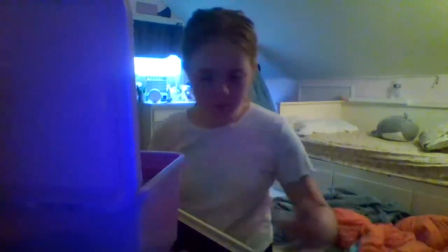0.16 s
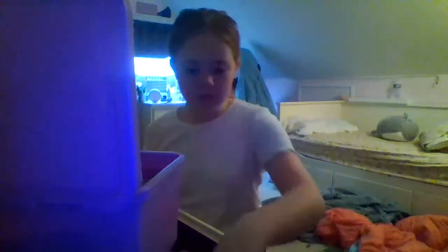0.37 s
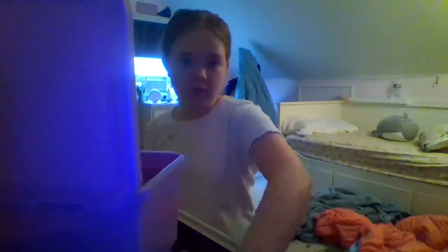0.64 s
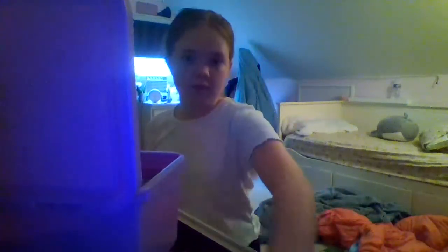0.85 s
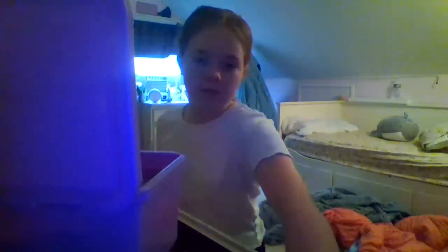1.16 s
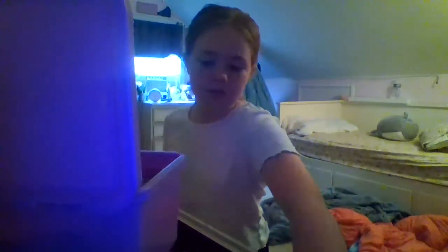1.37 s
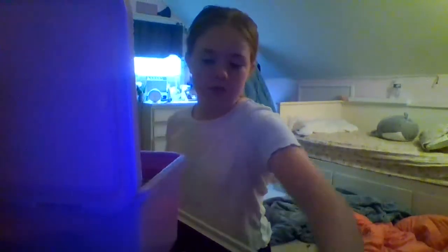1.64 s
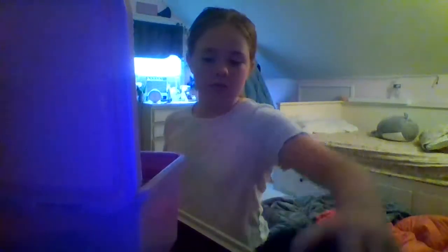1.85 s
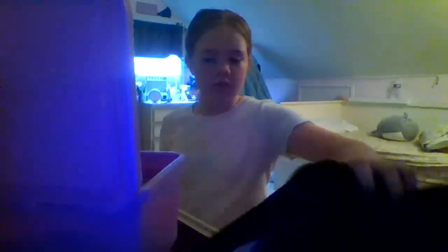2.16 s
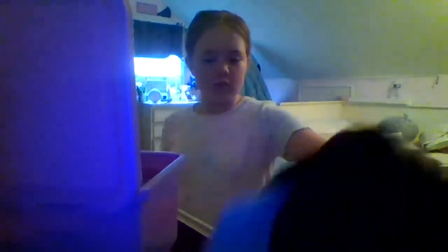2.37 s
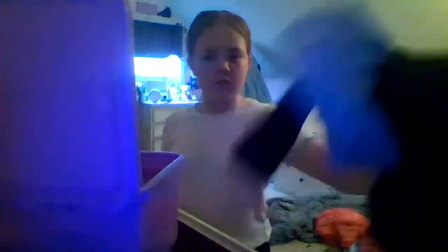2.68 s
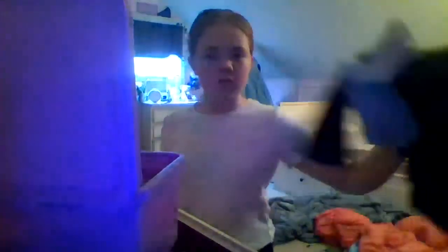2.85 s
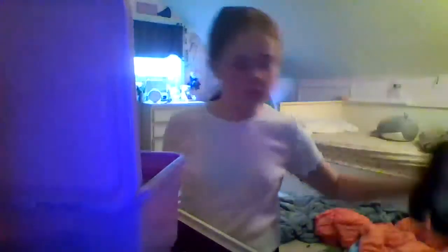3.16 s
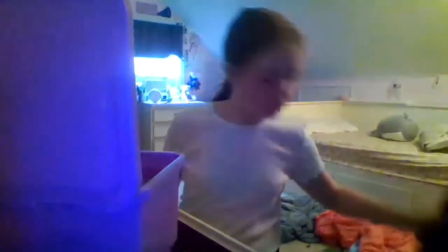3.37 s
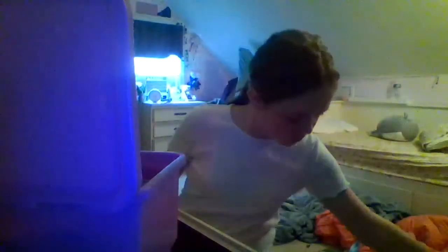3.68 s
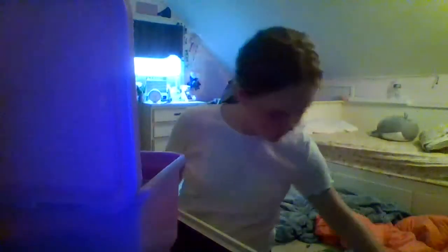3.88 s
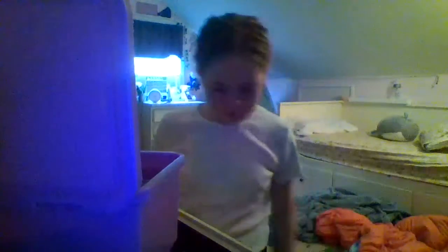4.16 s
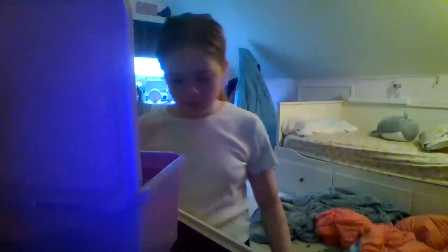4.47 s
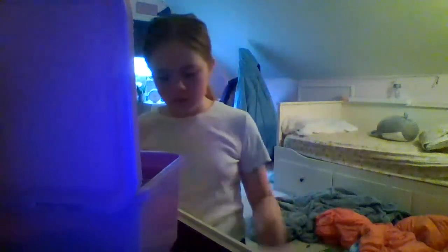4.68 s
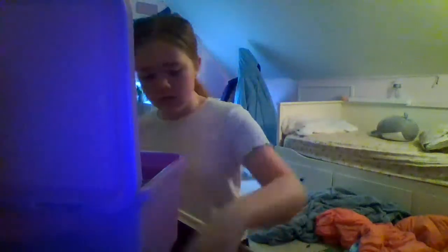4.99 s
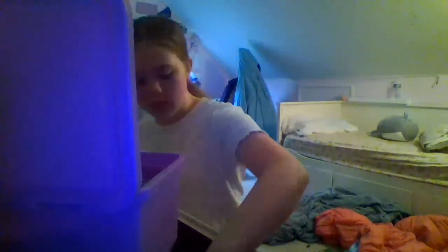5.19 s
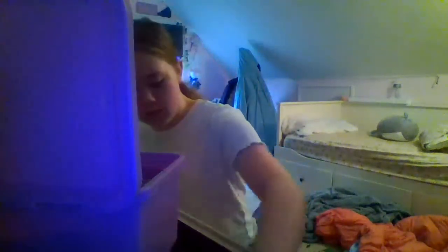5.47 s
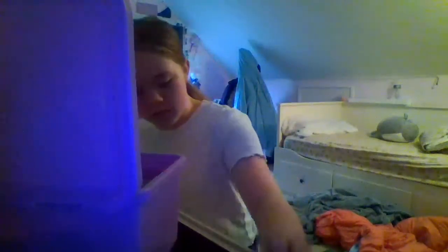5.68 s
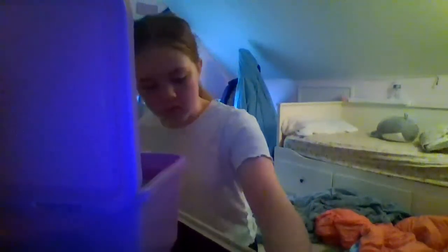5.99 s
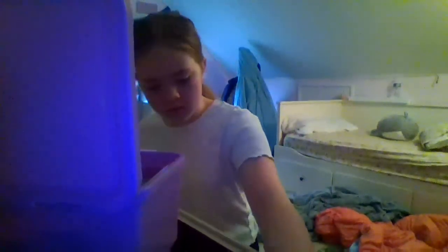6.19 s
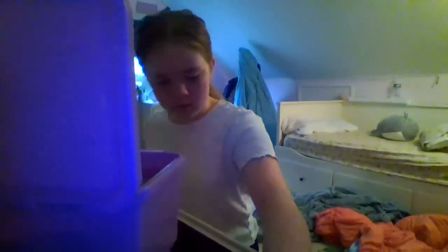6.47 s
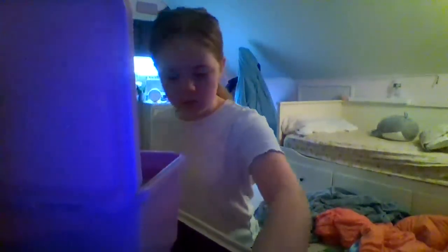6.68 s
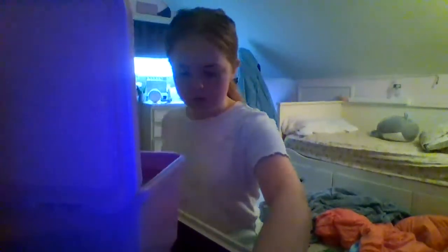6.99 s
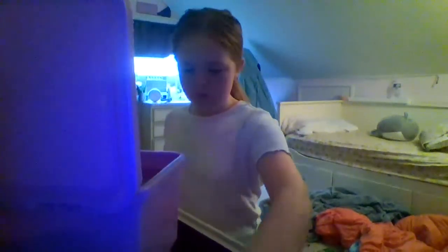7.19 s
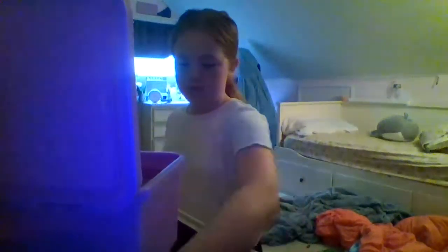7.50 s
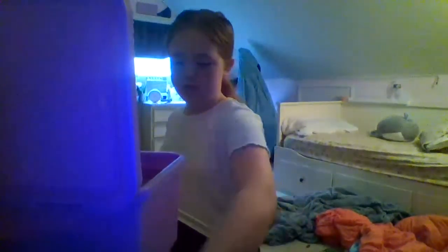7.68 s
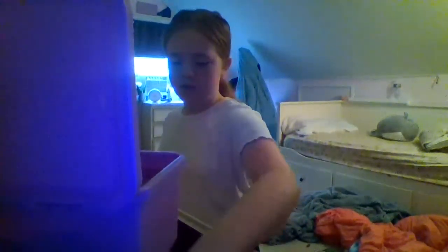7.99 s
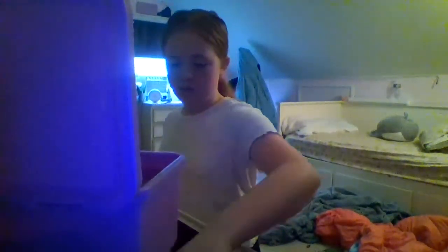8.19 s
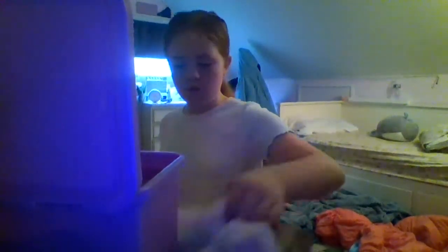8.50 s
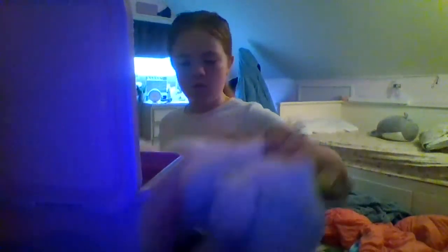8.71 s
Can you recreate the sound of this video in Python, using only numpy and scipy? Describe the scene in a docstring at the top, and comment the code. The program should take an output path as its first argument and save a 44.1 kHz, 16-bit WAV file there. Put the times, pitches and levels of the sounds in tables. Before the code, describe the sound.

In a small, furnished bedroom, hands rummage in a wooden drawer very close to a stereo microphone, over faint low hum, a thin whine and hiss. Soft rustling and a light touch come first; at 0.75 s a scrape swells into a rapid clatter of hollow knocks and clacks from 1.0 to 1.6 s, with low drawer bumps. From 2.0 to 2.5 s, lighter, brighter ticks mix with cloth swishes. It grows quiet, with faint touches around 3.1 and 3.9 s. At 5.2 s there is a woody bump, then a sharp, loud clack at 5.7 s. Faint rustles follow, a firm knock at 7.05 s, soft brushing and a dull bump at 7.7 s. Scraping builds from 8.0 s with a knock at 8.1 s, and heavy, slightly distorted thumps at 8.55 and 8.65 s leave a faint metallic ping fading away.

```python
"""Rummaging in a wooden drawer

Hands rummage through a drawer in a small bedroom, right beside a pair of tiny microphones.
Cloth swishes and things scrape over the wood: shaped noise that swells with each stroke of the hand.
Knocks are short chatters of noise through resonances; the drawer's bumps and a metal ping are dying sines.
A faint mains hum and hiss lie below; the microphones ring near 10 kHz and the loudest peaks clip."""
import sys
import numpy as np
from scipy import signal
from scipy.fft import rfft, irfft, next_fast_len
from scipy.io import wavfile

SR = 44100
rng = np.random.default_rng(int(sys.argv[2]) if len(sys.argv) > 2 else 0)


def unload_wav(signal):
    """Save mono or channel-first audio to the path in sys.argv[1] as 16-bit WAV at rate SR, clipped to [-1, 1]."""
    wavfile.write(
        sys.argv[1],
        SR,
        np.round(np.clip(np.atleast_2d(signal).T, -1, 1) * 32767).astype(np.int16),
    )


N = 390284
TIME = np.arange(N) / SR

# things knocking in the drawer; square hits rise fast, glancing ones slowly (levels before trims):
# [t/s, body level/dB, edge tick level/dB, pitch of the thing f/Hz, rise/s, settling t60/s]
KNOCKS = [(0.523, -42, -65, 377, 0.0023, 0.054), (0.98, -8.5, -38, 1700, 0.0013, 0.032),
          (1.001, -6.5, -9, 450, .0006, .11), (1.027, -8.5, -12.5, 1490, .0024, 0.051),
          (1.058, -3, -24, 1500, 0.0011, 0.074), (1.08, -6, -28, 790, 0.0012, .11),
          (1.097, -13.5, -38, 535, 0.0011, 0.071), (1.117, -13, -24, 1570, .0024, 0.076),
          (1.126, -7.5, -16, 1090, 0.00086, 0.068), (1.155, -13, -47, 1500, .002, 0.032),
          (1.241, -8.5, -28.5, 518, 0.003, .027), (1.273, -14, -27, 554, .003, 0.048),
          (1.341, -14.5, -31, 503, 0.00076, 0.045), (1.464, -18, -17, 380, 0.0033, 0.017),
          (1.561, -7.5, -11, 594, .0015, 0.042), (2.002, -27.5, -33, 6960, 0.00078, 0.25),
          (2.045, -10, -18.5, 4440, 0.0091, 0.093), (2.105, -24, -29, 1620, .0013, 0.041),
          (2.121, -15.5, -48, 2600, 0.00084, 0.06), (2.148, -27, -17, 6800, .0013, 0.043),
          (2.164, -23.5, -27.5, 627, .002, 0.12), (2.224, -20, -39, 3060, 0.0015, .087),
          (2.252, -22, -29.5, 1010, 0.00085, 0.095), (2.311, -13, -13, 1630, 0.00067, 0.083),
          (2.345, -19.5, -23.5, 7000, 0.00055, 0.11), (2.427, -22.5, -19.5, 6050, .0007, 0.047),
          (2.471, -25, -31, 7140, .001, 0.16), (3.028, -41.5, -51, 364, 0.0042, 0.21),
          (3.116, -32.5, -30.5, 4630, 0.0015, .1), (3.263, -44, -67, 700, .002, 0.047),
          (3.877, -31, -48.5, 666, 0.0018, 0.13), (3.96, -34.5, -53, 428, 0.0079, .1),
          (5.173, -19.5, -57, 620, .0007, 0.12), (5.235, -10.5, -13, 596, 0.0049, 0.07),
          (5.284, -25, -64, 1660, 0.00092, 0.24), (5.597, -33, -36.5, 5000, 0.0018, 0.28),
          (5.67, 2.5, -15.5, 2790, 0.0045, 0.049), (5.743, -12, -18, 3350, .0014, 0.035),
          (5.779, -27, -26.5, 4700, .001, 0.063), (6.301, -66, -42.5, 9000, .0004, 0.017),
          (6.35, -43, -70, 600, 0.0021, 0.069), (6.888, -33.5, -27, 5170, 0.0098, 0.056),
          (7.055, -3.5, -22, 1670, 0.0028, 0.05), (7.126, -43, -35, 3600, .001, 0.017),
          (7.71, -26, -40, 404, 0.0029, 0.18), (7.776, -35, -38.5, 420, 0.0022, .047),
          (8.012, -11.5, -42, 670, 0.0016, 0.059), (8.118, -4.5, -12.5, 504, 0.00028, 0.099),
          (8.53, -28, -21, 417, .0007, 0.28), (8.543, -13.5, -14, 1980, 0.00043, 0.073),
          (8.56, -1, -14.5, 644, 0.0015, 0.14), (8.651, -1, -20.5, 615, 0.0018, 0.12)]
# stereo width of tail and hiss: [f/Hz, gain/dB]
STEREO_WIDTH = [(100, -64), (2400, -33), (5000, -7.5), (15000, -18)]


def from_db(db):
    """Decibels to gain."""
    return 10 ** (np.asarray(db) / 20)


def rms_one(x):
    """Scale to rms 1."""
    return x / np.sqrt(np.mean(x ** 2) + 1e-20)


def at_hz(points, hz):
    """Read a table on a log-frequency axis."""
    known_hz, values = np.transpose(points)
    return np.interp(np.log(np.maximum(hz, 1)), np.log(known_hz), values)


def colour(x, spectrum):
    """Filter a steady signal by a table of gains over frequency."""
    size = next_fast_len(len(x))
    hz = np.arange(size // 2 + 1) * SR / size
    gain = from_db(at_hz(spectrum, hz))
    return irfft(rfft(x, size) * gain, size)[:len(x)]


def band(x, low_hz, high_hz):
    """Band-pass that roughly keeps the rms of a white input."""
    sos = signal.butter(2, [low_hz, high_hz], "band", fs=SR, output="sos")
    return signal.sosfilt(sos, x + 1e-18) * np.sqrt(SR / 2 / (high_hz - low_hz))


def resonate(x, hz, width_hz, boost_db):
    """Boost or dip one resonance: a two-pole peak is mixed with the sound itself."""
    radius = np.exp(-np.pi * width_hz / SR)
    zeros = np.array([1, 0, -1]) * (1 - radius ** 2) / 2
    poles = [1, -2 * radius * np.cos(2 * np.pi * hz / SR), radius ** 2]
    peak = signal.lfilter(zeros, poles, x + 1e-18)
    return x + (from_db(boost_db) - 1) * peak


def drift(rate):
    """Smooth random wander, about `rate` new values a second; rms 1."""
    steps = rng.standard_normal(N // 10)
    return rms_one(np.interp(TIME * rate, np.arange(len(steps)), steps))


def grains(size, spread_db):
    """Dense tiny contacts of very unequal strength; rms 1."""
    strength_db = spread_db * np.clip(rng.standard_normal(size), -2, 2)
    return rms_one(rng.standard_normal(size) * from_db(strength_db))


def add(track, s, sound):
    """Lay a sound into a track at a time in seconds."""
    at = int(np.clip(round(s * SR), 0, N - 1))
    track[at:at + len(sound)] += sound[:N - at]


def background(own_db=3.5, air_db=-35.0):
    """Low room noise and hiss, partly opposite in the two channels, over steady hum and a thin whine."""
    # mains hum and electronic whine: [f/Hz, rms level/dB before the microphones]
    hum_tones = [(120, -46.5), (240.5, -44.5), (7499, -65.5)]
    # spectrum of room noise and hiss: [f/Hz, relative level/dB]
    air_spectrum = [(20, 1), (35, 1.5), (70, -9.5), (180, -14), (300, -24), (500, -30), (1000, -36.5),
                    (3000, -39.5), (9000, -44.5), (16000, -40)]
    hum = 0
    for hz, db in hum_tones:
        hum = hum + from_db(db) * np.sqrt(2) * np.sin(2 * np.pi * (hz * TIME + rng.random()))
    white_pair = rng.standard_normal((2, N))
    shared, own = [from_db(air_db) * rms_one(colour(white, air_spectrum)) for white in white_pair]
    side = from_db(own_db) * colour(own, STEREO_WIDTH)
    return hum + shared + side * np.array([[1], [-1]])


def stroke(t, length, attack_share=0.29, release_t60_s=0.25):
    """A hand stroke swells over a share of its length, holds, and dies away when the hand stops."""
    swell = np.sin(np.pi / 2 * np.minimum(t / (attack_share * length), 1)) ** 2
    return swell * from_db(-60 * np.maximum(t - length, 0) / release_t60_s)


def catches(per_s=130, ring_cycles=17, low_hz=430, high_hz=1900):
    """Edges catch and let go at random, each time ringing briefly at some pitch; rms 1."""
    out, t = np.zeros(N), TIME[:SR // 16]
    chance, strength, pitch = rng.random(N), rng.standard_normal(N), rng.random(N)
    for at in np.flatnonzero(chance < per_s / SR):
        hz = low_hz * (high_hz / low_hz) ** pitch[at]
        decay = from_db(-60 * t * hz / ring_cycles)  # 60 dB down after ring_cycles periods
        add(out, at / SR, strength[at] * np.sin(2 * np.pi * hz * t) * decay)
    return rms_one(out)


def rubbing(scrape_trim_db=-5.5, catch_trim_db=-10.5, swish_trim_db=-1.5, slip_db=2.5, fold_db=1.73,
            dragged_db=6, dragged_width_hz=520, uneven_db=1.6, idle_db=-62,
            rumble_db=-20, rumble_follows=0.37):
    """Things stick and slip over the wood, cloth fibres brush past each other, shifting weight rumbles."""
    # strokes of the hand (levels before trims):
    # [t/s, length/s, scrape level/dB, swish level/dB, pitch of the dragged thing f/Hz]
    strokes = [(0, 0.0071, -31.5, -45, 450), (0.429, 0.35, -46.5, -43, 700),
               (0.745, 0.38, -20, -24.5, 1190), (1.255, 0.096, -26.5, -34, 1200),
               (1.544, 0.12, -30, -39, 1380), (1.676, 0.38, -37.5, -36, 690), (2.021, 0.48, -39, -36, 1410),
               (2.482, .04, -36, -38.5, 1800), (2.532, 0.15, -51, -43.5, 1200),
               (3.028, 0.061, -51, -43.5, 1300), (3.14, .17, -56, -54, 1300),
               (3.601, 0.18, -52.5, -48.5, 1100), (3.844, 0.13, -35.5, -47, 650),
               (4.205, 0.16, -67, -51, 700), (5.164, 0.043, -25, -34, 550), (5.214, 0.033, -27.5, -25, 620),
               (5.301, 0.11, -45.5, -39, 1600), (5.579, 0.14, -33, -38.5, 600),
               (5.736, 0.061, -30, -32.5, 600), (5.832, 0.1, -44, -47, 700), (6.011, .1, -50, -48.5, 597),
               (6.152, .25, -52, -61.5, 600), (6.928, 0.12, -61, -42.5, 1400), (7.17, 0.53, -50, -46, 1210),
               (7.82, 0.047, -50, -43, 600), (7.983, 0.58, -24, -33, 600), (8.269, 0.12, -18, -32, 590),
               (8.51, 0.12, -19, -29.5, 500)]
    # spectra of scraped wood, brushed cloth and the rumbling drawer: [f/Hz, relative level/dB]
    scrape_spectrum = [(120, -20), (300, -2), (550, 0.5), (1000, -9.5), (1600, -9.5), (2500, -14),
                       (5000, -23.5), (16000, -63)]
    swish_spectrum = [(500, -12), (1500, -2.5), (3000, 1.5), (6000, 2.5), (9000, 3.5), (12000, -0.5),
                      (16000, -3.5)]
    rumble_spectrum = [(25, -32), (50, -2), (110, 1.5), (170, -8), (260, -12), (500, -59)]

    slips, t = drift(140), TIME[:3 * SR // 2]
    grit = rms_one(colour(grains(N, spread_db=7.5), scrape_spectrum))
    edges = from_db(scrape_trim_db + slip_db * slips) * grit + from_db(catch_trim_db) * catches()
    edges = edges * from_db(uneven_db * drift(30))  # the hand presses unevenly

    scrape = np.zeros(N)
    wood_power, cloth_power = np.full((2, N), from_db(idle_db) ** 2)  # a faint stir between strokes
    for start, length, scrape_db, swish_db, hz in strokes:
        effort = stroke(t, length)
        at = rng.integers(N - len(t))  # each stroke takes a random stretch of the scraping
        dragged = rms_one(resonate(edges[at:at + len(t)], hz, dragged_width_hz, dragged_db))
        add(scrape, start, from_db(scrape_db) * effort * np.std(edges) * dragged)
        add(wood_power, start, (from_db(scrape_db) * effort) ** 2)
        add(cloth_power, start, (from_db(swish_db) * effort) ** 2)

    fibres = rms_one(colour(grains(N, spread_db=5.5), swish_spectrum))
    swish = np.sqrt(cloth_power) * from_db(swish_trim_db + fold_db * slips) * fibres
    # the rumble rises only rumble_follows dB per dB of scraping
    rumble_level = from_db(rumble_db) * np.sqrt(wood_power) ** rumble_follows
    rumble = rumble_level * rms_one(colour(rng.standard_normal(N), rumble_spectrum))
    return rumble + scrape + swish


def bumps(t60_s=0.16, sway_hz=54, sway_db=-6, sway_t60=0.25, side_hz=172, side_db=-7,
          panel_hz=330, panel_db=-14, panel_t60=0.089, cushion_s=0.0065):
    """A soft blow on the runners rings the drawer's lowest mode, sways the chest and stirs the panels."""
    # the drawer bumping in its chest: [t/s, level of the lowest mode/dB before cushioning, pitch f/Hz]
    blows = [(1.002, -1.5, 156), (1.075, -8, 176), (1.127, -9.5, 112.4), (1.463, 0, 120),
             (1.561, -8.5, 148), (1.874, -16.5, 106), (2.049, -21, 110), (3.876, -23.5, 91),
             (3.96, -18.5, 84), (5.17, 4.5, 109), (5.239, -4.5, 96), (5.618, -14, 54.4), (5.691, -11, 93.6),
             (7.056, -11.5, 123), (7.71, -3, 124), (8.128, -10, 150), (8.552, 11.5, 100),
             (8.66, 6.5, 108.6), (8.712, -2.5, 125.3), (8.768, -10.5, 116)]
    out, t = np.zeros(N), TIME[:SR // 2]
    for s, db, hz in blows:
        weight_db = -14 * max(np.log2(hz / 105), 0)  # light, higher bumps hardly move the chest
        modes = [(hz, 0, t60_s), (sway_hz, sway_db + weight_db, sway_t60),
                 (side_hz, side_db, t60_s), (panel_hz, panel_db, panel_t60)]
        load = 1 + 0.07 * rng.standard_normal(len(modes))  # the shifting contents detune the wood
        boom = 0
        for (mode_hz, level_db, decay_s), detune in zip(modes, load):
            ring = np.sin(2 * np.pi * mode_hz * detune * t)
            boom = boom + ring * from_db(level_db - 60 * t / decay_s)
        add(out, s, from_db(db) * boom * (1 - np.exp(-t / cushion_s)))
    return out


def metal():
    """A small metal piece, set ringing by the last knock: a faint ping of dying sines."""
    # its modes: [f/Hz, starting level/dB before the room, t60/s]
    modes = [(585, -33, 0.55), (2229, -34.5, 0.6), (4409, -50, 0.24)]
    out, t = np.zeros(N), TIME[:SR // 2]
    last_knock_s = KNOCKS[-1][0]
    for hz, db, t60 in modes:
        add(out, last_knock_s, np.sin(2 * np.pi * hz * t) * from_db(db - 60 * t / t60))
    return out


def knocks(hollow_trim_db=-4.0, clack_trim_db=-8.0, tick_trim_db=1.5, thing_width_hz=95, thing_db=7,
           overtone_db=6, brush_db=-22, brush_s=0.0053, size_pivot_hz=650, hollow_db_per_octave=-5.5):
    """Each knock is a quickly settling chatter: the wood sounds hollow, the thing clacks, its edges tick."""
    lead = 0.02  # s of grazing ahead of the hit
    out, t = np.zeros(N), TIME[:SR // 4] - lead
    for s, body_db, tick_db, hz, rise, t60 in KNOCKS:
        settling = from_db(-60 * np.maximum(t - rise, 0) / t60)
        blow = np.clip(t / max(rise, 1e-4), 0, 1) ** 2 * settling
        brush = from_db(brush_db) * np.exp(-np.abs(t) / brush_s)  # things graze around the hit
        chatter = grains(len(t), spread_db=5.0) * (blow + brush)
        # big, low-pitched things stir the hollow more, small ones less
        size_db = hollow_db_per_octave * np.log2(hz / size_pivot_hz)
        hollow = from_db(body_db + size_db + hollow_trim_db) * band(chatter, 281, 682)
        clack = from_db(body_db + clack_trim_db) * band(chatter, 900, 3160)
        tick = from_db(tick_db + tick_trim_db) * band(chatter, 3810, 12800)
        sound = resonate(hollow - clack + tick, hz, thing_width_hz, thing_db)
        # each thing has other overtones, one in each of three octaves
        for overtone_hz in 1000 * 2 ** (np.arange(3) + rng.random(3)):
            sound = resonate(sound, overtone_hz, thing_width_hz, overtone_db)
        add(out, s - lead, sound)
    return out


def drawer(x):
    """The drawer's panels and hollow colour what is handled inside: a chain of resonances."""
    # [f/Hz, width/Hz, boost/dB]
    resonances = [(396, 35, 4), (595, 70, 2), (992, 64, 4.5), (1150, 25, 4), (1465, 370, 3),
                  (2145, 73, 1.5), (2530, 130, -2)]
    for hz, width_hz, boost_db in resonances:
        x = resonate(x, hz, width_hz, boost_db)
    return x


def bedroom(x, echo_db=-14.0, gap_s=0.00568):
    """Dense reflections of a furnished room: decaying noise bands, longest in the bass."""
    # decay of the echo: [f/Hz, t60/s]
    decay = [(150, 0.33), (700, 0.15), (2000, 0.19), (6000, 0.23), (14000, 0.094)]
    t, edges = TIME[:SR // 2], np.geomspace(200, 18000, 8)
    echo = 0
    for low, high in zip(edges, edges[1:]):
        noise = np.sqrt(high - low) * band(rng.standard_normal(len(t)), low, high)
        echo = echo + noise * from_db(-60 * t / at_hz(decay, np.sqrt(low * high)))
    echo = echo * (t > gap_s)
    return x + from_db(echo_db) * signal.fftconvolve(x, echo / np.linalg.norm(echo))[:N]


def two_microphones(x, tail_t60=0.04, lag_samples=0.45, gap_s=0.002):
    """Sound reaches the left port a little sooner; a short noise tail widens the pair.

    The tail, strongest near 5 kHz, is added to one channel and subtracted from the other."""
    t, size = TIME[:SR // 10], next_fast_len(N)
    tail = rng.standard_normal(len(t)) * from_db(-60 * t / tail_t60) * (t > gap_s)
    tailed = signal.fftconvolve(x, tail / np.linalg.norm(tail))[:N]
    side = colour(tailed, STEREO_WIDTH)
    # phase turns shift each channel by half the lag
    half_lag = np.exp(-1j * np.pi * lag_samples * np.arange(size // 2 + 1) / size)
    left, right = irfft(rfft(x, size) * np.array([1 / half_lag, half_lag]), size)[:, :N]
    return np.array([left + side, right - side])


def scene():
    """What is handled sounds through the drawer; bumps and ping join it in the room."""
    handled = drawer(rubbing() + knocks())
    return background() + two_microphones(bedroom(handled + bumps() + metal()))


def record(dry, ceiling=0.98, port_hz=10180, port_width_hz=1045, port_db=16.5, cutoff_hz=15800):
    """The microphone ports ring, the loudest peaks clip flat, the top is cut."""
    ringing = resonate(dry, port_hz, port_width_hz, port_db)
    clipped = np.clip(ringing, -ceiling, ceiling)
    top_cut = signal.ellip(10, 0.2, 70, cutoff_hz, fs=SR, output="sos")
    return signal.sosfilt(top_cut, clipped)


dry = scene()
out = record(dry)
unload_wav(out)
```